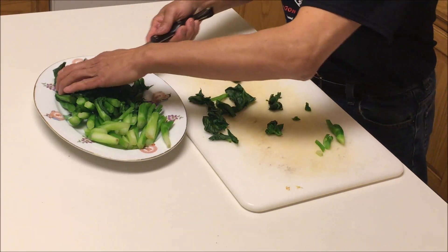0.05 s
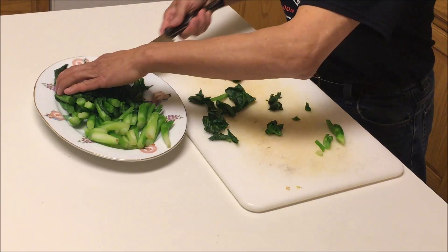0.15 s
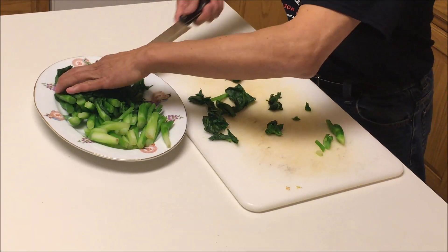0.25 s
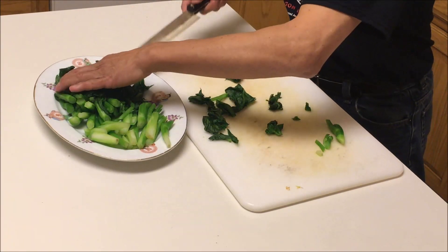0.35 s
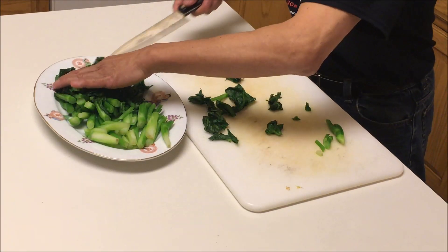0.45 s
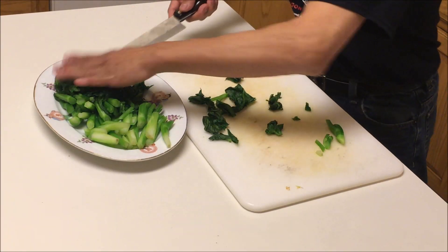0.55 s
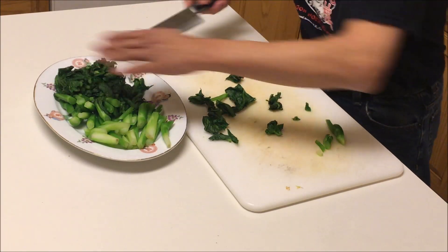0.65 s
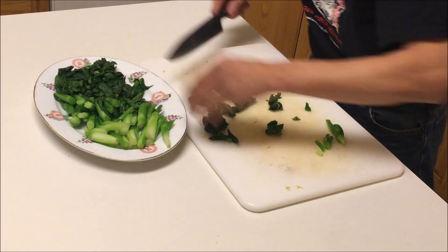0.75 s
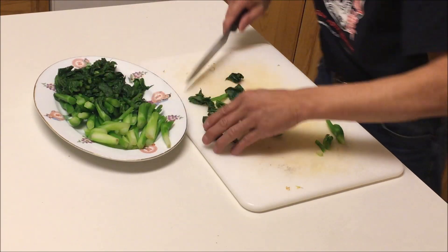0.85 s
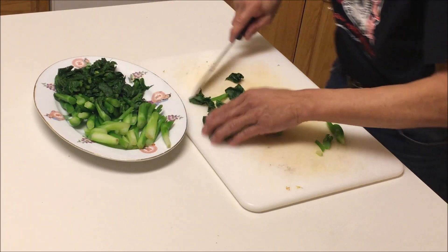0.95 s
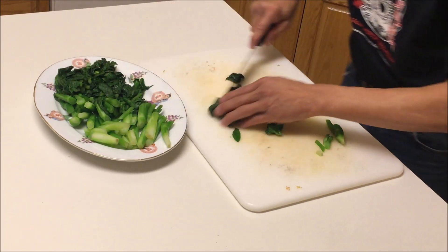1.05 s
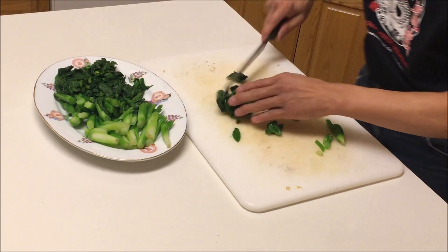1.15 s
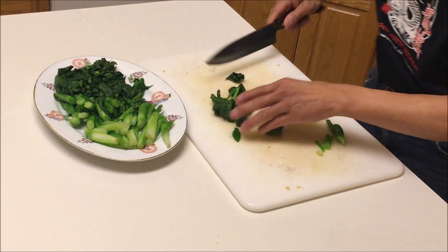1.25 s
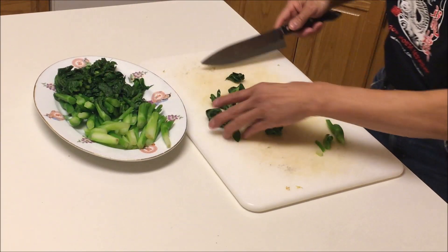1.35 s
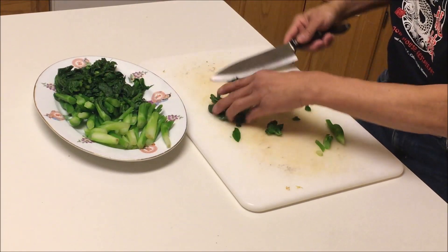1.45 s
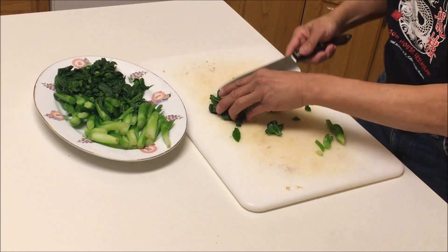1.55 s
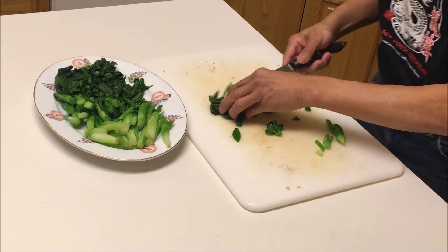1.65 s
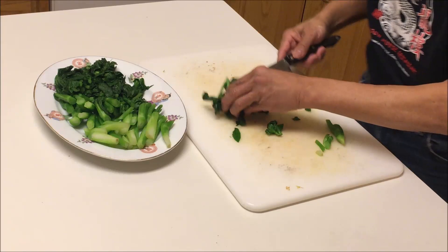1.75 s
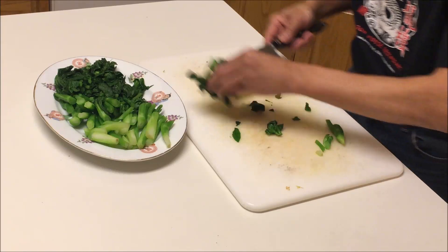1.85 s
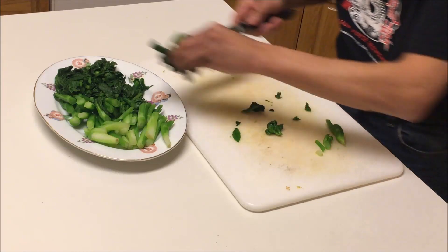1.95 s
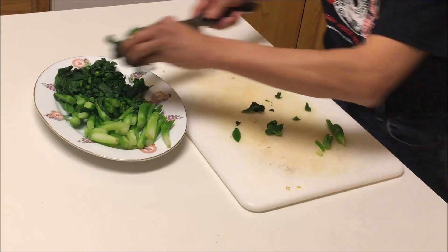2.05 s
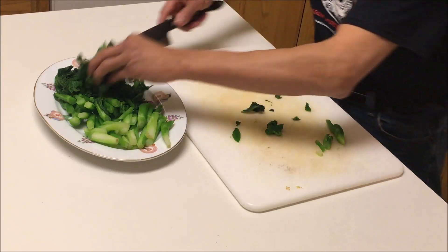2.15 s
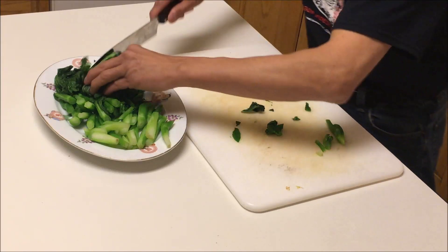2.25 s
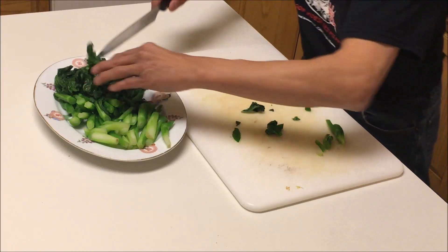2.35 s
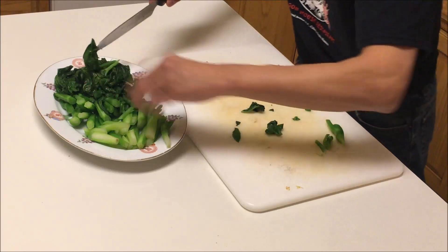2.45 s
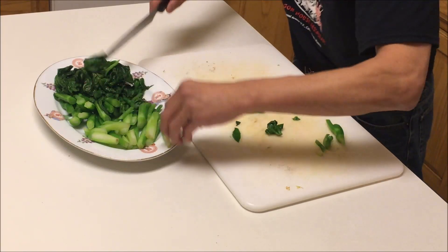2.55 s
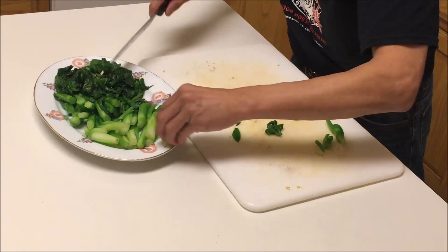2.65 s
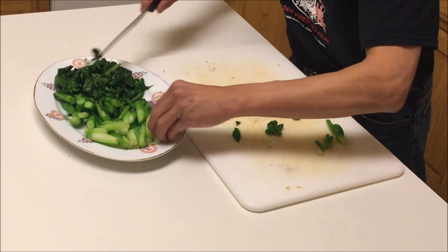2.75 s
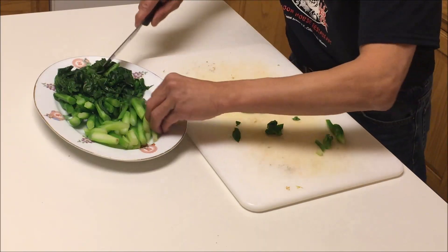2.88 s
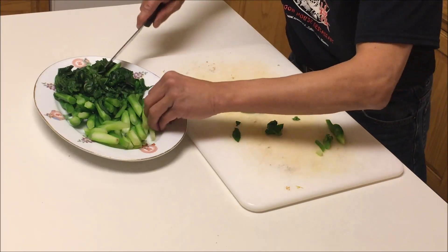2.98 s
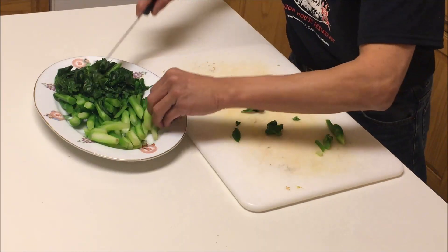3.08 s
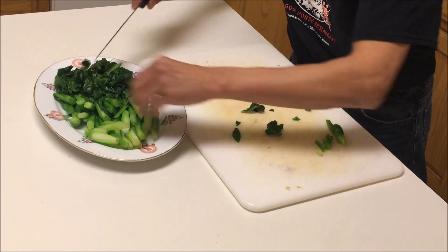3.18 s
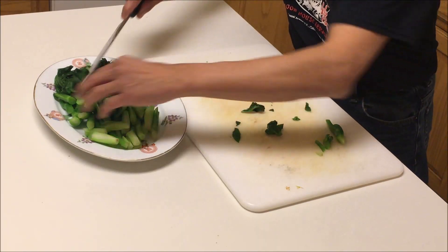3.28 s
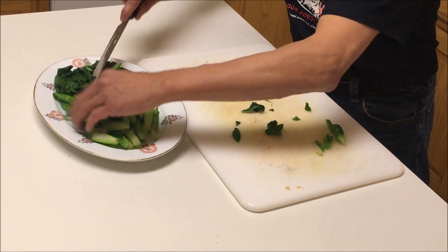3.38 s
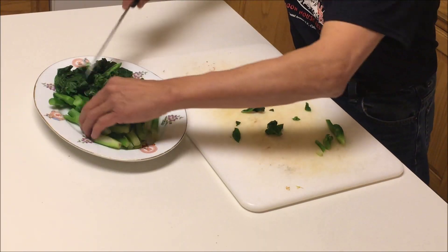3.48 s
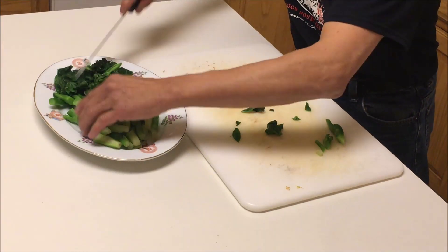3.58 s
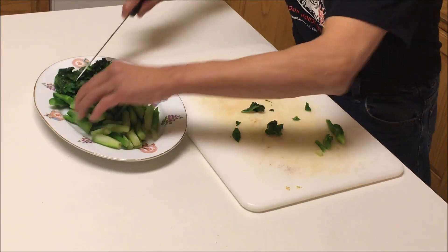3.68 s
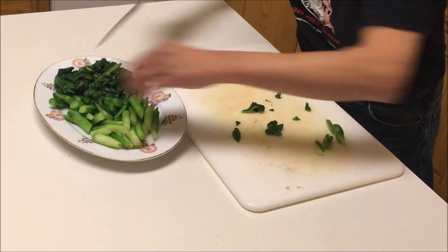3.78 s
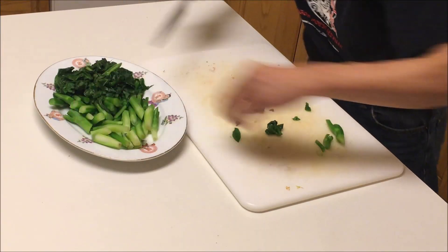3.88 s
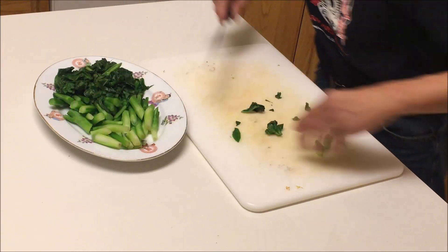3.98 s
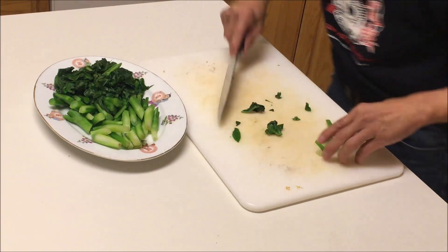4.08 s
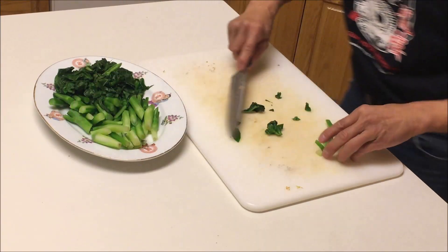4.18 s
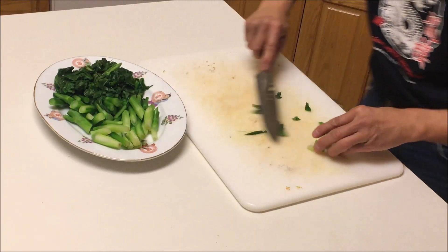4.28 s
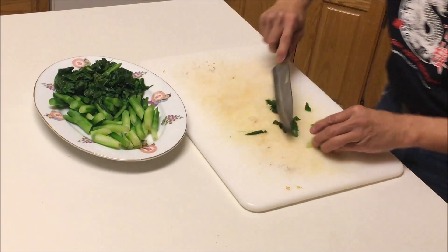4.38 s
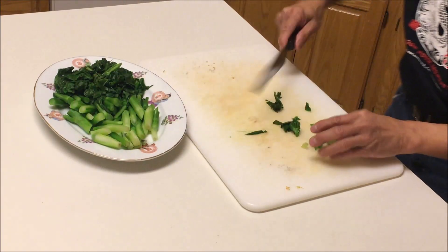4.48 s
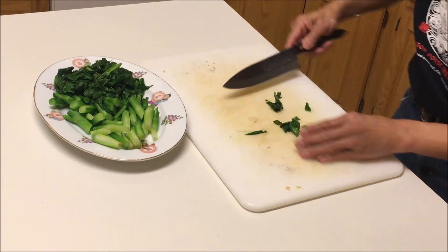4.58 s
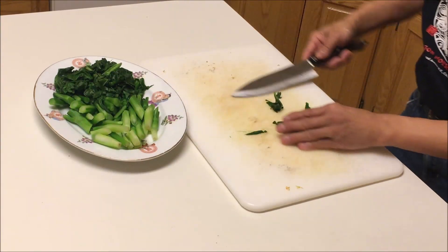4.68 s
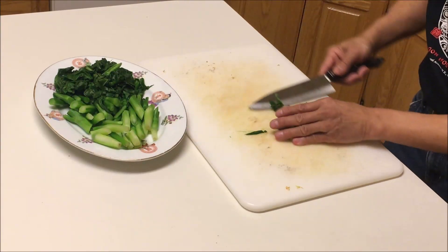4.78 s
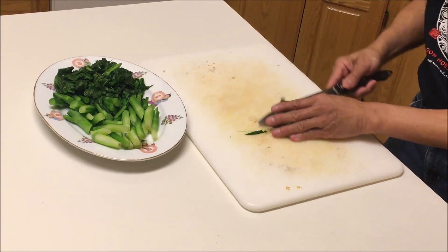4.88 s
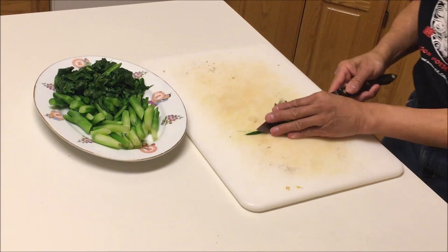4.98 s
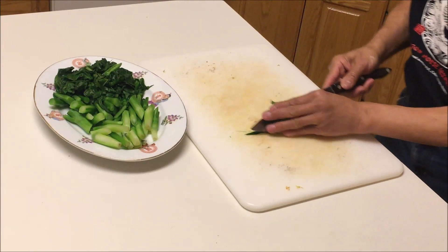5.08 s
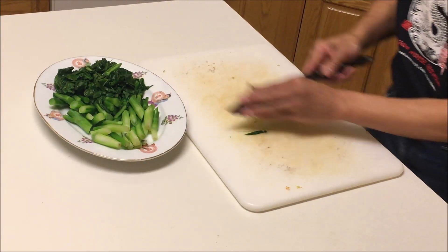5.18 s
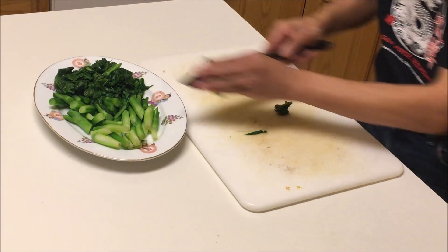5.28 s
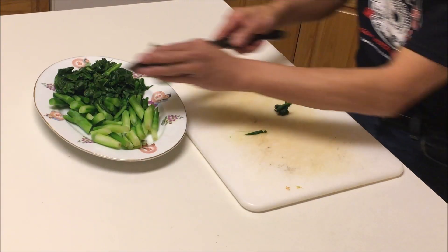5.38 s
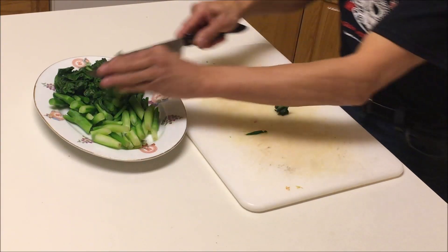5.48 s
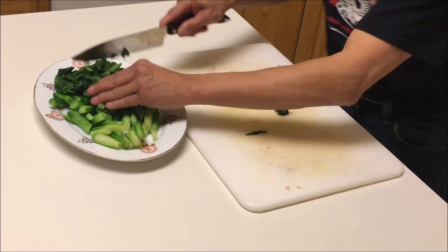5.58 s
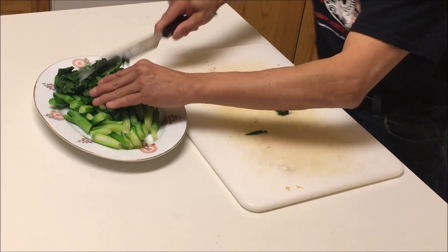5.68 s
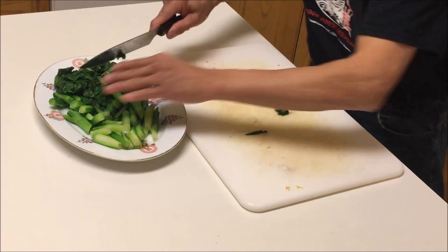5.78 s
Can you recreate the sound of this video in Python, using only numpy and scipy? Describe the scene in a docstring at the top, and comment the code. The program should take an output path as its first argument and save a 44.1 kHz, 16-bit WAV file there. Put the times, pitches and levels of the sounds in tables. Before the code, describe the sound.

A refrigerator's low hum and airy noise run throughout in a small kitchen with a short echo. Wet leaves rustle very faintly at first. At about 1 second a nearby knife lands on a plastic cutting board with a sharp clack, the loudest sound, followed by a short scrape. A softer knock at 1.5 seconds leads into two quick drags with a slight steel ring. The greens crackle and squeak faintly between the strokes. From 2.8 to 3.2 seconds a china plate rocks on the counter, two light bumps then two firmer clinking knocks, followed by a faint pat on the leaves. At 4.2 seconds the knife knocks again and scrapes with a bright hiss. Another knock and scrape come at 4.7 seconds, and the board groans briefly under the blade near 4.9. A last faint leaf rustle fades by 5.7 seconds.

```python
"""First you hear a refrigerator's hum and airy noise, and a faint rustle of wet leaves. Then a knife
knocks on a plastic cutting board and scrapes chopped greens together, twice early and twice late;
its edge hisses as it slips, and the last push makes the board groan. In between, the greens squeak
faintly and are patted onto a china plate, which rocks on the counter.
A small kitchen answers every knock with a short echo."""
import sys
import numpy as np
from scipy import signal
from scipy.fft import rfft, irfft, next_fast_len
from scipy.io import wavfile
from scipy.ndimage import map_coordinates

SR = 44100
rng = np.random.default_rng(int(sys.argv[2]) if len(sys.argv) > 2 else 0)


def waveform_to_disk(signal):
    """Save audio, clipped to [-1, 1], as 16-bit WAV at the path in sys.argv[1]."""
    frames = np.transpose(np.atleast_2d(signal))
    scaled = np.clip(frames, -1, 1) * 32767
    samples = np.round(scaled).astype(np.int16)
    wavfile.write(sys.argv[1], SR, samples)


N = 257103
TIME = np.arange(N) / SR
AGE = np.arange(SR * 3 // 4) / SR  # seconds since one short sound began


def amp(db):
    """Turn decibels into a number to multiply by."""
    return 10 ** (np.asarray(db) / 20)


def unit(x):
    """Scale a sound to an average strength (rms) of 1."""
    return x / np.sqrt(np.mean(x ** 2) + 1e-20)


def along(points, hz):
    """Read between (frequency, value) points, giving each octave equal room."""
    freqs, values = np.transpose(points)
    return np.interp(np.log(hz + 1), np.log(freqs), values)


def filtered(x, response):
    """Turn each frequency f up or down by response(f)."""
    size = next_fast_len(len(x) + SR // 4)
    return irfft(rfft(x, size) * response(np.fft.rfftfreq(size, 1 / SR)), size)[:len(x)]


def coloured(x, spectrum):
    """Shape bass and treble by (frequency [Hz], level [dB]) points; rms 1."""
    return unit(filtered(x, lambda f: amp(along(spectrum, f))))


def resonate(x, peaks):
    """Pass a sound through an object that favours some frequencies; rms 1."""
    def response(f):
        return sum(amp(db) * 1j * f * width / (hz * hz - f * f + 1j * f * width)
                   for hz, width, db in peaks)
    return unit(filtered(x, response))


def contact(x, cut_hz, order):
    """Dull the treble: a softer touch lasts longer and stirs fewer high tones."""
    return signal.sosfilt(signal.butter(order, min(cut_hz, SR / 3), fs=SR, output='sos'), x)


def wobble(rate):
    """A smooth curve through rate random points a second."""
    return map_coordinates(rng.standard_normal(int(N * rate / SR) + 4), [TIME * rate])


def arch(s, length, peak=0.51):
    """One hand movement from time s: up from 0 to 1 at the share peak of its length, then back."""
    phase = np.interp(TIME, [s, s + length * peak, s + length], [0, 1, 0])
    return np.sin(np.pi / 2 * phase)


def slips(rate, spread_db):
    """Surfaces catch and let go: about rate tiny clicks a second, of random sizes."""
    happens = rng.random(N) < rate / SR
    return happens * rng.standard_normal(N) * amp(spread_db * rng.standard_normal(N))


def ring(tones, scatter_db):
    """A struck object's fading tones, at slightly new strengths for each blow."""
    return sum((-1) ** k * amp(db + scatter_db * rng.standard_normal() - 60 * AGE / fade_s)
               * np.sin(2 * np.pi * hz * AGE) for k, (hz, db, fade_s) in enumerate(tones))


def add(track, s, x):
    """Mix x into the track, starting at s seconds."""
    part = track[round(s * SR):][:len(x)]
    part += x[:len(part)]


# The kitchen's echo; a fade time is how long a fall of 60 dB takes: (frequency [Hz], fade time [s])
KITCHEN_FADE = [(100, 0.53), (400, 0.34), (1000, 0.47), (2200, 0.3), (6000, 0.37), (14000, 0.25)]
def room_fade(x):
    """Fade a sound as the kitchen does, each frequency at its own speed."""
    hz, t, bands = signal.stft(x, SR, nperseg=256)
    fade = amp(-60 * t / along(KITCHEN_FADE, hz)[:, None])
    return signal.istft(bands * fade, SR)[1][:len(x)]


def in_room(x, echo_db):
    """The direct sound plus its echo from the walls."""
    tail = room_fade(rng.standard_normal(len(AGE))) * (1 - np.exp(-AGE / 0.0019))
    echo = signal.fftconvolve(x, tail / np.linalg.norm(tail))[:N]
    return (x + amp(echo_db) * echo) / np.hypot(1, amp(echo_db))


def wash(spectrum, crack_db, fade_s):
    """Many crowded tones blur into noise: a short crack, then the room's answer."""
    crack, tail = (coloured(rng.standard_normal(len(AGE)), spectrum) for _ in range(2))
    onset = 1 - np.exp(-AGE / 0.0011)
    return (amp(crack_db - 60 * AGE / fade_s) * crack + room_fade(tail)) * onset


def rotor(shaft_hz, tones):
    """A spinning shaft hums at multiples of its speed, each tone wavering a little."""
    out = np.zeros(N)
    for multiple, db in tones:
        strength = np.sqrt(2) * amp(db + 0.36 * wobble(3.14))
        cycles = multiple * shaft_hz * TIME + rng.random()
        out += strength * np.sin(2 * np.pi * cycles + 0.11 * wobble(0.8))
    return out


# Moving air and low rumble: (frequency [Hz], relative level [dB])
AIR_SPECTRUM = [(100, -8), (200, -1.5), (340, -4.5), (420, -8), (700, -9.5), (950, -9), (1300, -18.5),
                (1700, -24.5), (2400, -29), (2900, -31.5), (4700, -37.5), (5600, -35.5), (10500, -40.5),
                (15500, -42.5)]
RUMBLE_SPECTRUM = [(20, -13), (33, -27), (45, -12), (56, -6.5), (72, -10), (100, -2.5), (125, -7),
                   (160, -14.5), (220, -17), (400, -75)]
# The hum of two spinning parts: (multiple of the shaft's speed, level [dB])
COMPRESSOR_TONES = [(1, -51.5), (2, -53.5), (4, -71), (5, -63), (6, -68), (7, -76), (9, -71), (14, -71)]
FAN_TONES = [(2, -59), (3, -67), (7, -71), (9, -68), (12, -63), (20, -74), (27, -72), (28, -74), (30, -69)]
def refrigerator():
    """The compressor and the fan hum against each other, over rumble and moving air."""
    air = amp(-54.5 + 0.31 * wobble(4.8)) * coloured(rng.standard_normal(N), AIR_SPECTRUM)
    rumble = amp(-59) * coloured(rng.standard_normal(N), RUMBLE_SPECTRUM)
    hum = rotor(shaft_hz=59.1, tones=COMPRESSOR_TONES) + rotor(shaft_hz=23.6, tones=FAN_TONES)
    return hum + air + rumble


# Fingers take or pat the greens: (time [s], length [s], level [dB])
HANDFULS = [(0.298, 0.48, -76.5), (1.75, 0.73, -78), (3.288, 0.17, -68), (3.698, 0.29, -84),
            (5.15, 0.5, -71.5)]
# Wet leaves squeak: (time [s], length [s], pitch [Hz], level [dB])
SQUEAKS = [(0.865, 0.048, 7170, -67.5), (1.366, 0.04, 2045, -55), (1.904, 0.039, 2035, -63.5),
           (2.751, 0.029, 2054, -54.5), (2.848, 0.044, 2003, -59.5), (2.9, 0.032, 8450, -74),
           (3.649, 0.02, 2000, -66.5)]
def greens():
    """Wet leaves crackle under the fingers and now and then squeak hoarsely."""
    crackle = coloured(slips(rate=900, spread_db=2.5),
                       [(500, 7), (1500, 2), (3000, -6), (7000, -12), (15000, -15.5)])
    resting_hand = amp(-72)
    out = crackle * (resting_hand + sum(amp(db) * arch(s, length) for s, length, db in HANDFULS))
    for s, length, hz, db in SQUEAKS:
        band = [(hz, hz / 18, 0)]
        squeak = resonate(resonate(rng.standard_normal(len(AGE)), band), band)
        swell = np.sin(np.pi * np.clip(AGE / length, 0, 1))
        add(out, s, amp(db) * swell * squeak)
    return in_room(out, echo_db=-5)


# The plate drops onto the counter: (time [s], level [dB])
PLATE_DROPS = [(2.798, -41.5), (2.960, -38), (3.0408, -24), (3.1423, -25.5)]
# Its low knock, and its high ring with close pairs of tones from the oval shape:
# (frequency [Hz], relative level [dB], fade time [s])
PLATE_LOW_TONES = [(142, -1, 0.089), (213, -3, 0.19), (242, -3.5, 0.18), (320, -11, 0.11), (370, -21, 0.17),
                   (625, -1, 0.08), (777, -6, 0.12), (1150, -8, 0.032)]
PLATE_HIGH_TONES = [(1910, 2.5, 0.15), (2000, -9, 0.2), (2930, -6.5, 0.21), (2973, -5.5, .18),
                    (3420, -9, .07), (4090, -13, 0.14), (5300, -13, 0.17), (5360, -21, .15),
                    (5750, -18, .12)]
# The noisy part of its knock: (frequency [Hz], relative level [dB])
PLATE_WASH = [(50, -14), (130, 6), (260, 3.5), (400, 0), (700, -4), (1200, -11), (2000, -23), (6000, -23)]
def plate_knocks():
    """The pressed plate tips and drops back, brighter the harder it falls; greens damp its ring."""
    firm_drop_db, firm_cut_hz = -24, 1630
    out = np.zeros(N)
    for s, db in PLATE_DROPS:
        force_db = db - firm_drop_db
        cut_hz = firm_cut_hz * 2 ** (force_db / 35)  # an octave brighter for every 35 dB
        body = ring(PLATE_LOW_TONES, scatter_db=2.5) + wash(PLATE_WASH, crack_db=2.5, fade_s=0.024)
        knock = amp(db - 6) * contact(body, cut_hz, order=3)
        tick = wash([(700, -6), (2000, 12.5), (4000, -5), (6000, -17), (12000, -32)],
                    crack_db=23, fade_s=0.0079)
        clink = amp(-48.5) * ring(PLATE_HIGH_TONES, scatter_db=1.5) + amp(-52.5) * tick
        add(out, s, knock + amp(1.8 * force_db) * clink)  # the clink grows faster than the knock
    return out


# The blade is pressed flat under the last leaves, a jerk then a slide: (time [s], length [s], level [dB])
FLAT_PUSHES = [(4.886, 0.018, -32), (4.905, 0.084, -37.5)]
# The tones of the pressed board: (frequency [Hz], width [Hz], relative level [dB])
BOARD_GROAN = [(262, 18, 0), (365, 24, 5), (837, 31, -3), (925, 28, -5), (1240, 42, -25), (1810, 81, -20)]
def blade_chatter():
    """Sticking and slipping at an uneven, rising rate, the flat blade makes the board groan."""
    start_hz, rise_hz_per_s = 116, 192  # slips quicken as the knife gathers speed
    slip_hz = start_hz + rise_hz_per_s * np.maximum(TIME - FLAT_PUSHES[0][0], 0)
    cycles = np.cumsum(slip_hz * (1 + 0.07 * wobble(120))) / SR
    slipping = np.cos(np.pi * cycles) ** 8  # one narrow pulse a cycle
    jerks = slipping * (1 + 2.24 * rng.standard_normal(N))  # each slip is a push with a short rub in it
    pressing = sum(amp(db) * arch(s, length) for s, length, db in FLAT_PUSHES)
    sliding = pressing > 0
    groan = resonate(jerks * sliding, BOARD_GROAN) * np.sqrt(np.mean(sliding))  # rms near 1 in the slide
    return in_room(contact(pressing * groan, cut_hz=2250, order=6), echo_db=-4)


# The steel blade's own tones: (frequency [Hz], width [Hz], relative level [dB])
BLADE_TONES = [(3300, 170, -4), (4020, 280, 0), (5330, 100, 2.5), (6270, 45, 5.5), (7160, 89, 3),
               (8100, 45, 7), (8550, 63, 4), (8970, 150, -2.5), (9760, 100, -0.5), (11000, 74, -3),
               (12700, 80, 3), (12300, 80, -8), (13620, 40, 6.5), (15100, 51, -1), (15100, 55, -6)]
def blade_ring(shaking):
    """Shaken by a scrape or a blow, the steel rings at its own high tones."""
    return resonate(shaking, BLADE_TONES)


# Pushes of the knife across the board: (time [s], length [s], hiss level [dB], drag level [dB],
# blade ring relative to the hiss level [dB], singing tone [Hz])
STROKES = [(1.046, 0.067, -51.5, -42, -0.5, 6270), (1.492, 0.12, -69, -42.5, 5, 5280),
           (1.597, 0.13, -68.5, -45.5, 6.5, 5260), (4.224, 0.15, -43, -41, -1, 6270),
           (4.377, 0.024, -44.5, -47, 0.5, 6290), (4.739, 0.19, -61, -49, -1.5, 6250),
           (4.885, 0.13, -59, -47, 1, 6230)]
# The hiss of the edge: (frequency [Hz], relative level [dB])
EDGE_HISS = [(500, -1), (1500, 7.5), (3000, 1), (4700, -1), (7000, -4), (9500, 13), (10500, 5), (12000, 15),
             (14000, -24), (15500, -19)]
# The board under the edge, and the edge biting in: (frequency [Hz], width [Hz], relative level [dB])
BOARD_DRAG = [(258, 16, 14.5), (360, 90, 10), (496, 54, -4.5), (560, 39, -5.5), (900, 50, 9.5),
              (1180, 84, -43), (1760, 83, -23.5)]
EDGE_RASP = [(1872, 64, -3), (2790, 190, -13), (3080, 130, -13)]
def knife_scrapes():
    """On the scratched plastic, speed makes the edge hiss and the blade ring; pressure shakes the board."""
    hiss_gain, ring_gain, drag_gain, song = np.zeros((4, N))
    for s, length, hiss_db, drag_db, ring_db, hz in STROKES:
        speed = amp(hiss_db) * arch(s, length) ** 1.34  # the power makes the arch more pointed
        hiss_gain += speed
        ring_gain += amp(ring_db) * speed
        drag_gain += amp(drag_db) * arch(s, length, peak=0.41) ** 1.3
        song += amp(ring_db - 7.5) * speed * resonate(rng.standard_normal(N), [(hz, hz / 110, 0)])
    grit = amp(1.3 * wobble(70))  # knife marks catch the edge unevenly
    edge = amp(-5.5) * coloured(slips(rate=4200, spread_db=-4.5), EDGE_HISS)
    steel = amp(-2) * blade_ring(slips(rate=5100, spread_db=5))
    bite = amp(-3.5) * hiss_gain / hiss_gain.max()  # the rasp needs speed as well as pressure
    rasp = bite * resonate(slips(rate=3200, spread_db=2), EDGE_RASP)
    board = resonate(slips(rate=900, spread_db=0.5), BOARD_DRAG)
    knife = grit * (hiss_gain * edge + ring_gain * steel) + song
    return in_room(knife, echo_db=-4) + in_room(drag_gain * (board + rasp), echo_db=2.5)


def rim_echo(x, delay_s, strength):
    """A bending wave runs to the board's rim and back, colouring the knock."""
    return filtered(x, lambda f: 1 + strength * np.exp(-2j * np.pi * f * delay_s)) / np.hypot(1, strength)


# The knife lands; the light row at 1.048 s is the hand coming down softly: (time [s], board level [dB], treble
# cut-off [Hz], counter thump [dB], knife bending [dB], blade ring [dB])
KNOCKS = [(.957, -16.5, 2630, -25.5, -26, -42.5), (1.0482, -35, 895, -37, -59, -62),
          (1.4852, -28.5, 1720, -37, -55, -42), (4.199, -21, 1470, -29.5, -30.5, -49.5),
          (4.733, -28, 1620, -42, -36, -69)]
# Tones of the board, the counter and the bending knife:
# (frequency [Hz], relative level [dB], fade time [s])
BOARD_TONES = [(256, -9, 0.23), (316, -8.5, 0.27), (408, -11.5, 0.059), (483, -7, 0.1), (637, -4, 0.091),
               (760, -11, .05), (918, -21, 0.18), (1270, -5, 0.038), (1428, -17, 0.029), (2030, -11, 0.045),
               (2440, -11, 0.021)]
COUNTER_TONES = [(88, 0, 0.21), (153, 3.5, 0.11)]
BENDING_TONES = [(870, -8, 0.36), (937, -3, 0.22), (956, -7.5, 0.44), (1290, -18, .18)]
# The noisy part of the board's clack: (frequency [Hz], relative level [dB])
BOARD_WASH = [(60, -21), (150, -5), (195, -2), (450, 1), (950, -1.5), (1600, -8.5), (2500, -5.5),
              (3000, -32), (8000, -15.5)]
def knife_knocks():
    """The edge lands with a tick: the board clacks, the counter thumps, the blade bends and rings."""
    out = np.zeros(N)
    for s, db, cut_hz, thump_db, bend_db, blade_db in KNOCKS:
        board = amp(-2) * ring(BOARD_TONES, scatter_db=-5)
        board += amp(-5.5) * wash(BOARD_WASH, crack_db=8, fade_s=0.04)
        board = contact(rim_echo(board, delay_s=0.00348, strength=0.18), cut_hz, order=4)
        thump = contact(ring(COUNTER_TONES, scatter_db=-2), cut_hz=220, order=2)
        tick = wash([(1000, -15), (3100, 8.5), (4500, -8), (7000, -5.5), (15000, -18.5)],
                    crack_db=13.5, fade_s=0.028)
        steel = contact(blade_ring(rng.standard_normal(len(AGE))), cut_hz=6000, order=2)
        steel *= amp(-60 * AGE / 0.11)  # fades in 0.11 s
        bending = contact(ring(BENDING_TONES, scatter_db=1.5), cut_hz=1900, order=2)
        knife = amp(bend_db) * bending + amp(blade_db) * steel
        add(out, s, amp(db) * (board + amp(-30.5) * tick) + amp(thump_db) * thump + knife)
    return out


def scene():
    """Everything that sounds at the counter, mixed into one channel."""
    mix = knife_knocks() + plate_knocks() + knife_scrapes() + blade_chatter() + greens() + refrigerator()
    return mix[None]


def record(dry):
    """Take away the deepest bass and the very highest treble."""
    bottom_hz, top_hz = 37, 15830
    thinned = signal.sosfilt(signal.butter(6, bottom_hz, 'highpass', fs=SR, output='sos'), dry[0])
    return filtered(thinned, lambda f: f < top_hz)[None]


dry = scene()
out = record(dry)
waveform_to_disk(out)
```